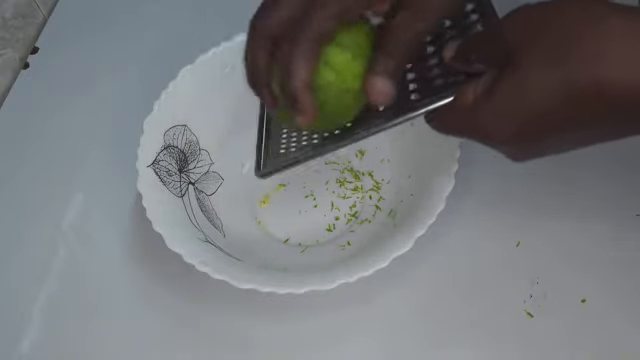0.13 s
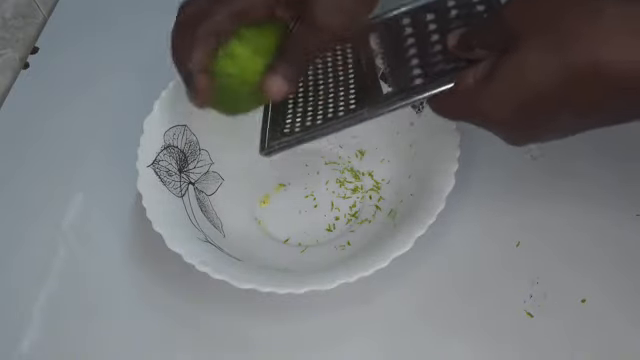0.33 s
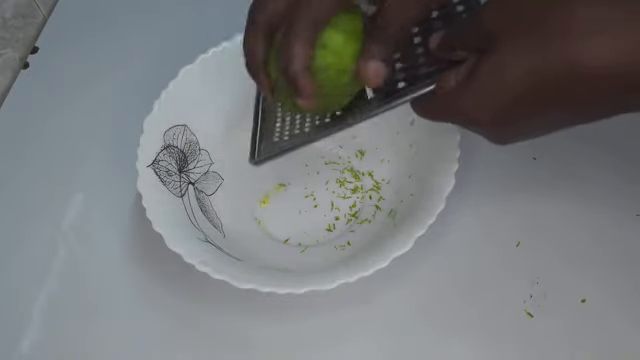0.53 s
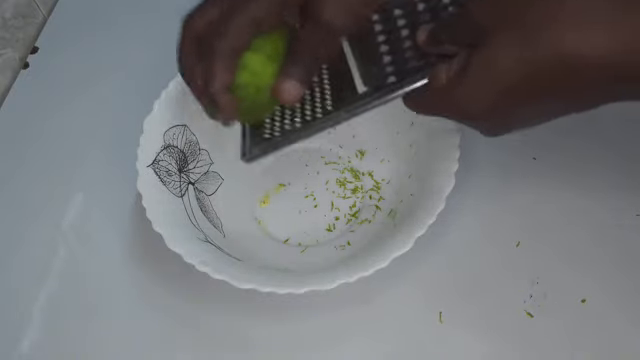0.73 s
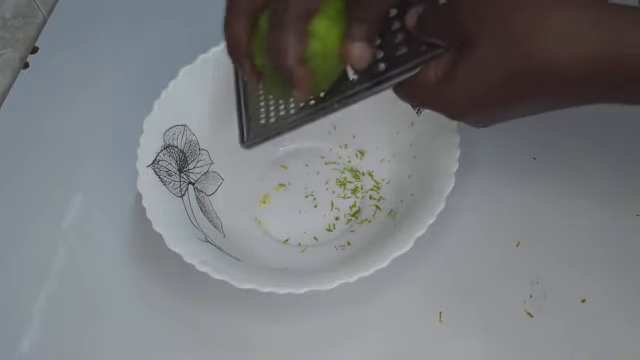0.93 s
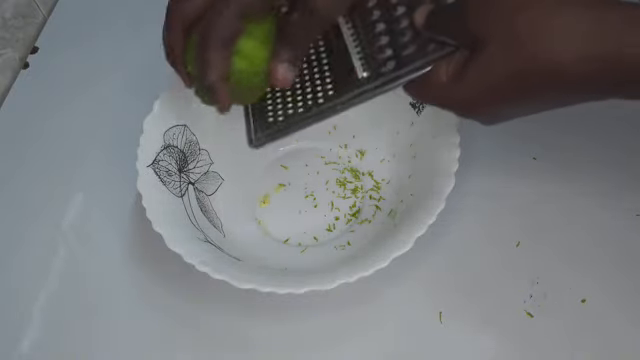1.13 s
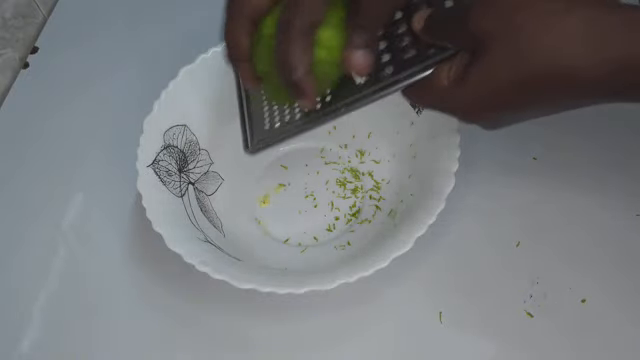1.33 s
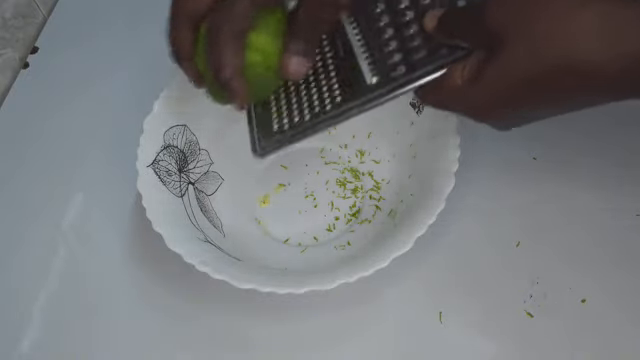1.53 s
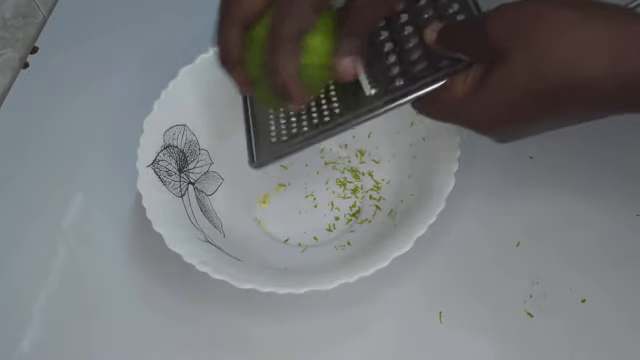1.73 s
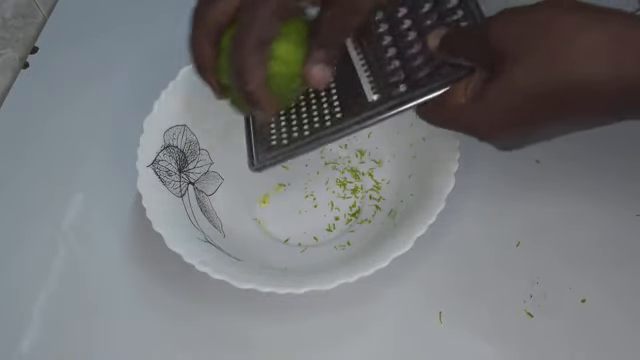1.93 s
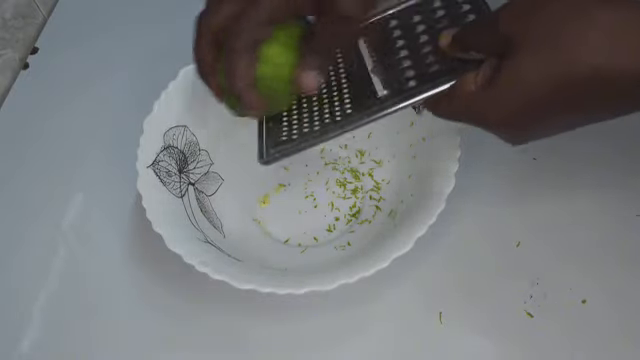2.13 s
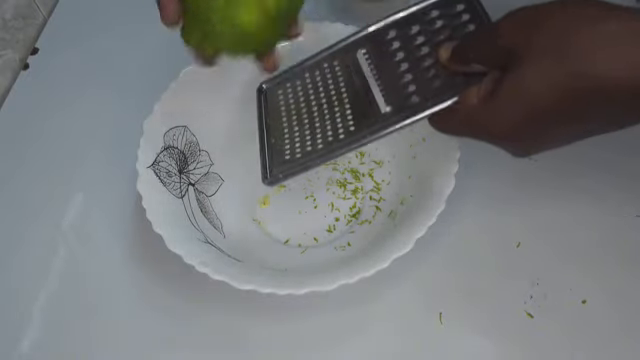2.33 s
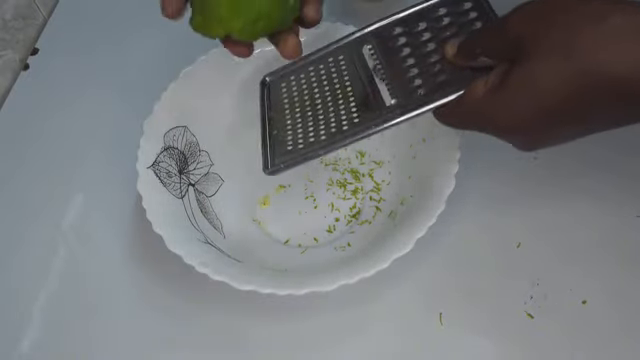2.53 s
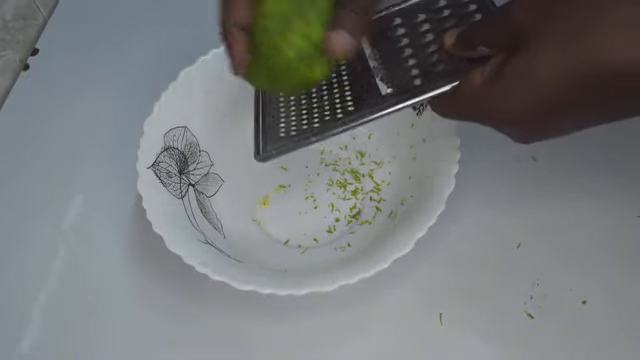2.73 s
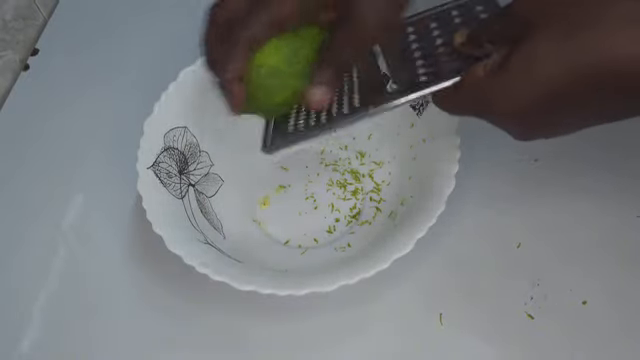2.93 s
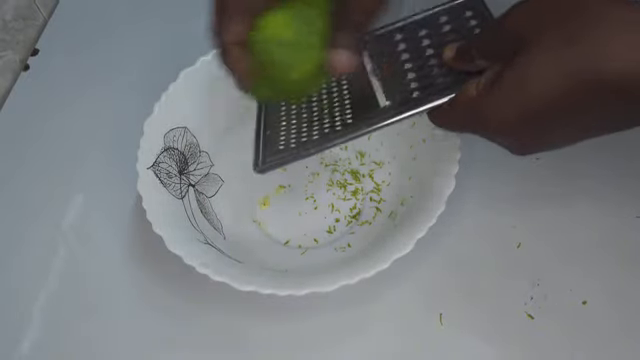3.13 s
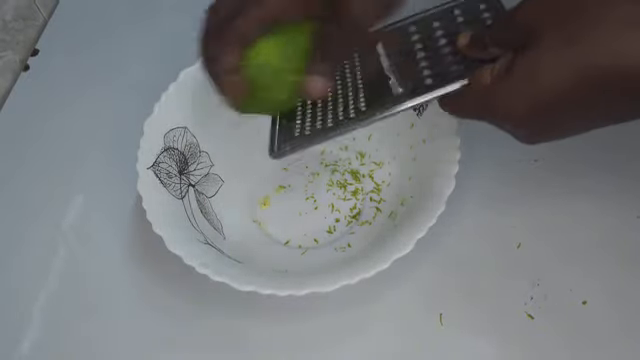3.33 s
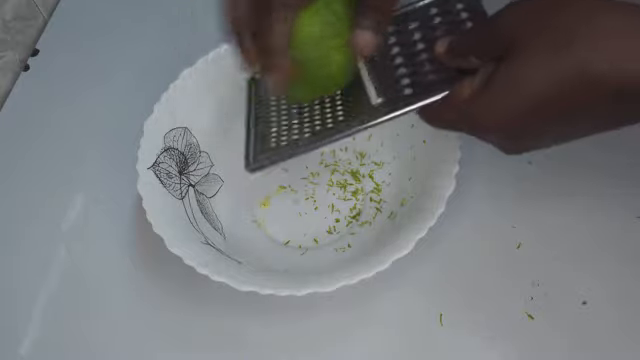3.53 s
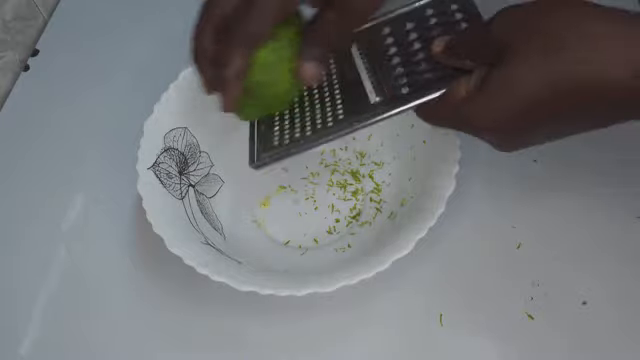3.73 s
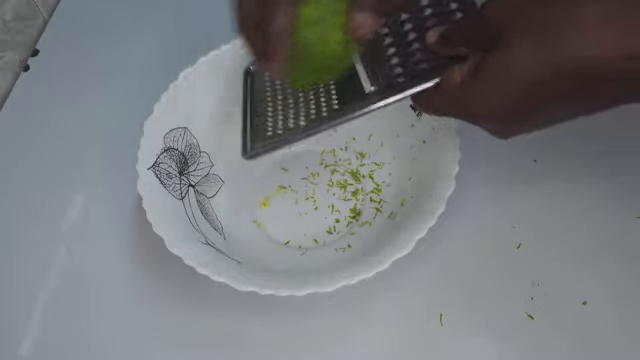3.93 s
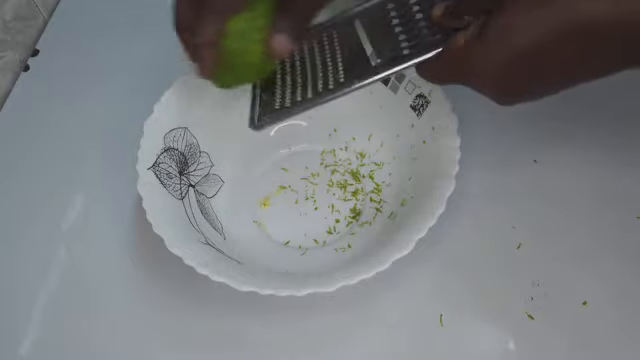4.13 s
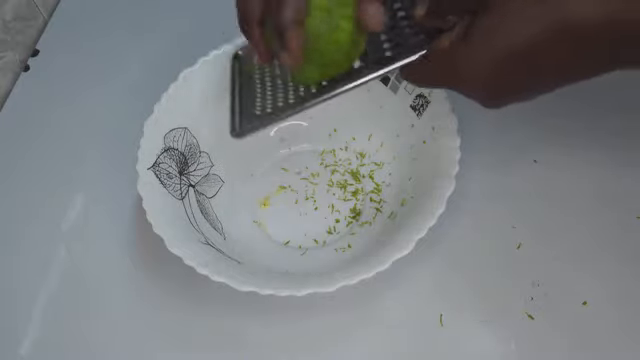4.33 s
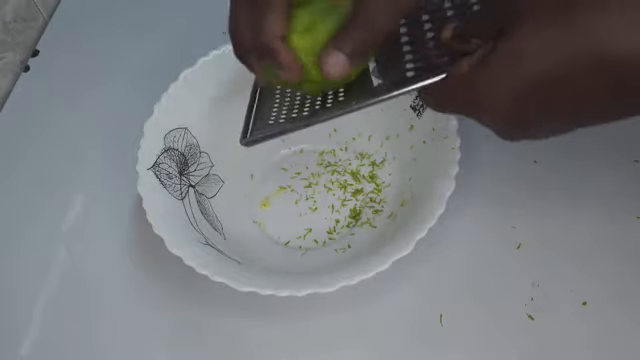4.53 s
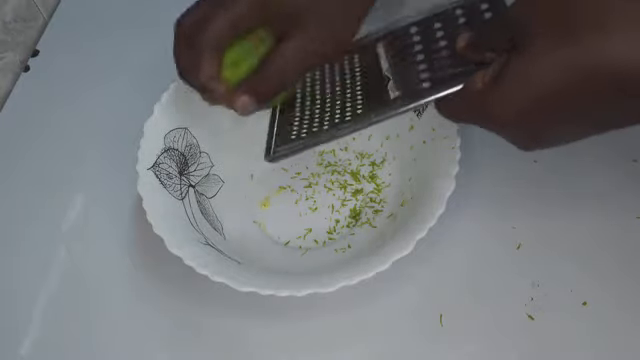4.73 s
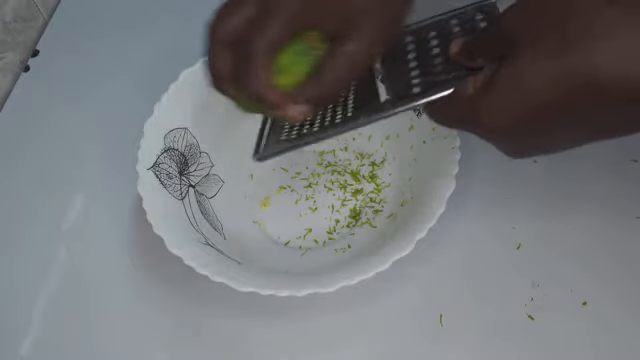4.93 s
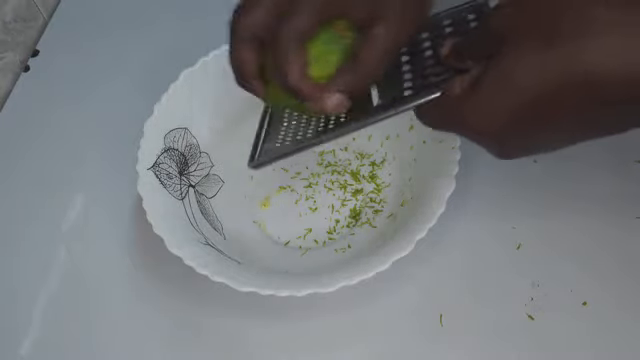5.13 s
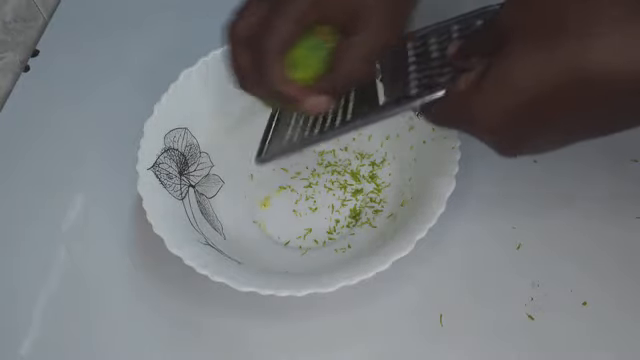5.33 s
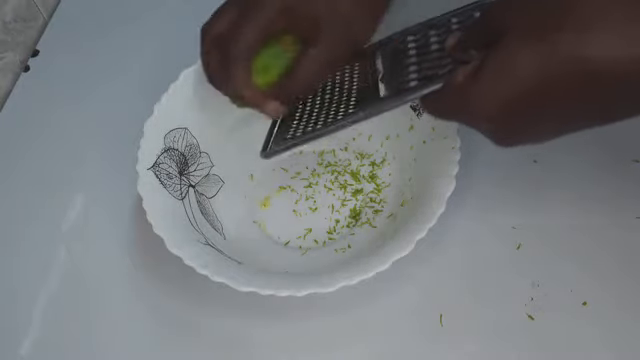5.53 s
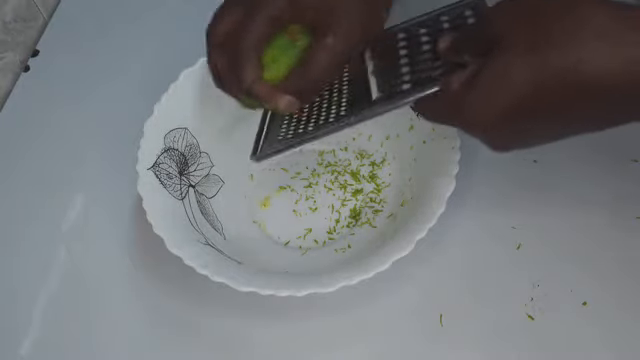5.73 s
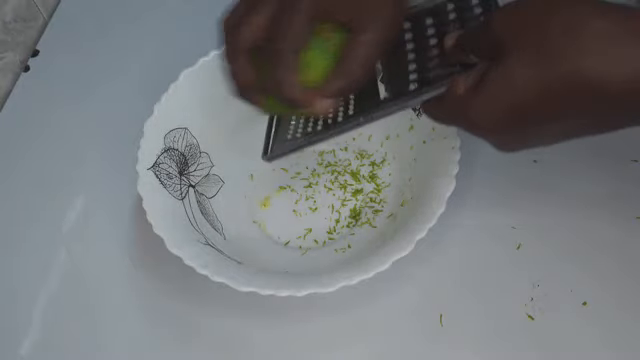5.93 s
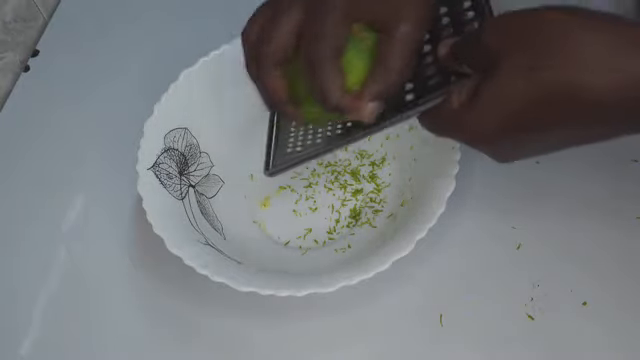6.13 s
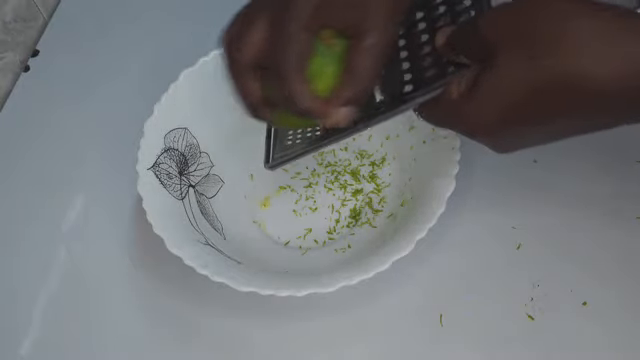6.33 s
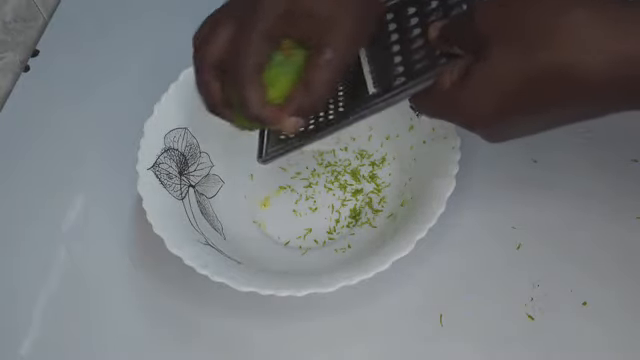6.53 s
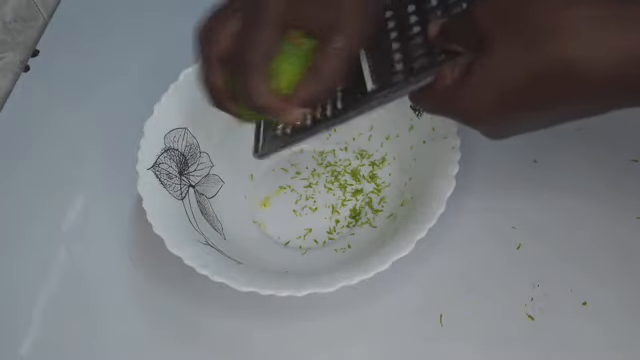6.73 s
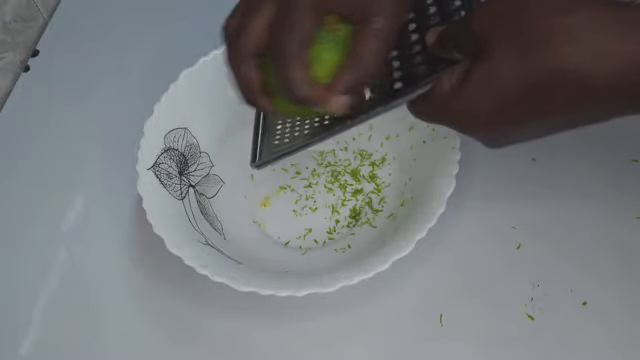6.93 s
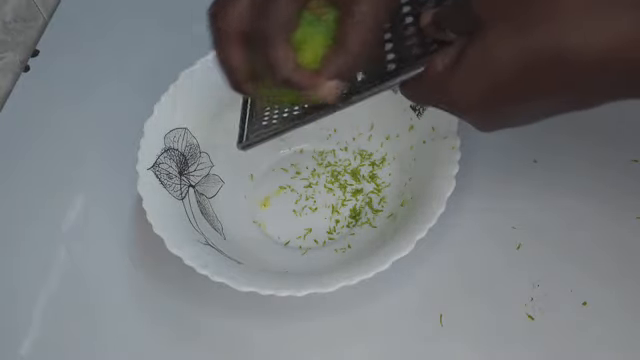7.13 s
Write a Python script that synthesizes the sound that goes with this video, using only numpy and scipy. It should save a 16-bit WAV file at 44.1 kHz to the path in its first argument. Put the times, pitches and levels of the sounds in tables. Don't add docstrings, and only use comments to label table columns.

```python
import sys
import numpy as np
from scipy import signal
from scipy.fft import rfft, irfft, next_fast_len
from scipy.io import wavfile
from scipy.ndimage import uniform_filter1d, map_coordinates

SR = 44100
rng = np.random.default_rng(int(sys.argv[2]) if len(sys.argv) > 2 else 0)


def gain_from_db(level_db):
    decades = np.asarray(level_db, float) / 20
    return 10 ** decades


def int16_out(signal):
    q = np.round(np.clip(np.atleast_2d(signal).T, -1, 1) * 32767)
    wavfile.write(sys.argv[1], SR, q.astype(np.int16))


N = 320607
TIME = np.arange(N) / SR

# [t/s, peak level/dB, plate above the peak/dB, ring f/Hz]
SNAGS = [(0.0245, -54, -18.5, 7400), (0.2096, -34, -9, 7270), (0.5741, -45, 1, 5100),
         (0.597, -50, -6, 5430), (0.6135, -35, 6, 7980), (0.636, -25.5, -6, 7370), (0.651, -20, -6, 11500),
         (0.9239, -49.5, -3, 6800), (1.461, -22, -20.5, 11600), (2.309, -47.5, -14, 7000),
         (2.4897, -67.5, -18, 13070), (2.5277, -64, -33, 11350), (2.594, -75, -18.5, 12900),
         (3.3837, -15.5, -26.5, 7470), (3.686, -38, 4, 7250), (4.125, -23, -27, 9840),
         (4.431, -40, 1, 6380), (4.5074, -55, -14, 7800), (4.6638, -16, 4.5, 11500),
         (4.843, -40, -9, 11500), (5.2468, -17, -3, 11540), (5.3275, -22.5, -24, 7840),
         (5.5805, -14.5, -12, 7950), (5.7498, -23, -16, 7760)]
# [t/s, peak level/dB, rattle above it/dB, low thud above it/dB, knock f/Hz]
LANDINGS = [(0.15, -39, -4.5, -13, 635), (0.521, -41.5, -13.5, -24, 606), (0.922, -48.5, -5, -19, 870),
            (1.328, -45, -12, -19, 855), (1.695, -47, -8, -14, 800), (2.065, -44, -7, -28, 617),
            (2.852, -39.5, -8.5, -17.5, 701), (3.264, -41, -16.5, -23, 640), (3.605, -38.5, -3.5, -10, 674),
            (4.019, -36.5, -28, -17.5, 635), (4.377, -38.5, -6.5, -25, 635), (4.428, -43, -10, -23, 720),
            (4.503, -61.5, -2, -14, 519)]


def unit(x):
    return x / np.sqrt(np.mean(x ** 2) + 1e-20)


def along(points, hz):
    f, value = np.transpose(points)
    return np.interp(np.log(hz + 1), np.log(f + 1), value)


def wobble(rate):
    knots = rng.standard_normal(int(N * rate / SR) + 4)
    return map_coordinates(knots, [TIME * rate])


def filtered(x, response):
    size = next_fast_len(N + SR // 2)
    hz = np.fft.rfftfreq(size, 1 / SR)
    return irfft(rfft(x, size) * response(hz), size)[..., :N]


def resonances(modes):
    def response(f):
        total = 0
        for k, (centre, width, db) in enumerate(modes):
            damping = 1j * f * width
            total = total + (-1) ** k * gain_from_db(db) * damping / (centre * centre - f * f + damping)
        return total
    return response


def body(force, modes, broad_db, lo_hz, hi_hz):
    ringing = resonances(modes)

    def response(f):
        high_pass = 1j * f / (lo_hz + 1j * f)
        band = high_pass / (1 + 1j * f / hi_hz) ** 2
        return ringing(f) + gain_from_db(broad_db) * band * high_pass

    power = np.mean(np.abs(response(np.linspace(0, SR / 2, 4096))) ** 2)
    return filtered(force, response) / np.sqrt(power)


def ports(pair, alike):
    def mid_side(hz):
        turn = np.arccos(np.clip(along(alike, hz), -1, 1)) / 2
        return np.array([np.cos(turn), np.sin(turn)])
    mid, side = filtered(pair, mid_side)
    return np.array([mid + side, mid - side])


def pressure():
    # [t/s, swell/s, bite/dB, top/dB, weight on the bowl/dB]
    single_strokes = [(.19, 0.078, -45.5, -31.5, -2), (.575, 0.11, -57, -33, 1),
                      (1.018, 0.073, -41.5, -37, -1.5), (1.397, 0.066, -37.5, -33.5, -4.5),
                      (1.772, 0.079, -38, -34, -0.5), (2.108, 0.063, -39.5, -32.5, -1),
                      (2.918, 0.063, -42.5, -36.5, 2.5), (3.311, 0.071, -42.5, -36, 0.5),
                      (3.703, 0.085, -42, -38.5, -0.5), (4.071, 0.067, -42, -35.5, 1),
                      (4.593, 0.064, -44.5, -36, 4.5)]
    down_strokes = [(4.934, 0.055, -38, -38.5, 1), (5.198, 0.047, -38, -36, 2.5),
                    (5.327, 0.024, -37.5, -41.5, 1), (5.436, 0.066, -36, -34.5, -1),
                    (5.576, 0.056, -39, -49, 0.5), (5.695, 0.049, -37, -40, -2),
                    (5.926, 0.058, -38.5, -34, -1), (6.184, 0.058, -35.5, -35.5, 0),
                    (6.433, 0.066, -39, -34, 0.5), (6.696, 0.063, -40.5, -32, -0.5),
                    (6.956, 0.055, -36.5, -32.5, 1.5), (7.218, .043, -35.5, -33, 0)]
    up_strokes = [
        (-.03, 0.043, -68, -72, 4),
        (4.81, 0.059, -49, -46, 4.5),
        (5.085, 0.044, -46, -46.5, 4.5),
        (5.8, 0.057, -50, -48.5, 3),
        (6.045, 0.066, -47, -47, 5.5),
        (6.305, .067, -50, -44.5, 5),
        (6.575, .063, -50, -46, 3.5),
        (6.82, 0.073, -48.5, -47, 7),
        (7.085, 0.065, -47, -45, 6.5),
    ]
    # [attack/s, attack depth/dB, release/s, release depth/dB, flex of the plate/dB]
    single_motion = (0.0048, 8, 0.0314, 13, -1)
    down_motion = (0.012, 8.4, 0.041, 19, 1.4)
    up_motion = (0.023, 8.6, 0.026, 11.6, .1)
    plate_over_db, bowl_over_db = (1.5, -4.5, -5, -8), (-4.5, -8.5, -9.5, -14)
    kinds = [(single_strokes, single_motion), (down_strokes, down_motion), (up_strokes, up_motion)]
    gain = np.zeros((3, N))
    for strokes, (attack, rise_db, release, fall_db, flex_db) in kinds:
        for s, swell, bite_db, top_db, weight_db in strokes:
            top_s = max(swell, attack + .002)
            corners = s + np.array([0, attack, top_s, top_s + release])
            near = slice(max(0, round((s - .1) * SR)), round((corners[-1] + .02) * SR))
            t = TIME[near]
            bite = np.clip(1 + (t - s) / .007, 0, 1) ** 2
            creep = gain_from_db(-17) * np.clip(1.2 + (t - s) / 0.026, 0, 1)
            lift = np.clip(1 + (corners[-1] - t) / 0.015, 0, 1) ** 2
            touch = np.maximum(bite, creep) * lift
            tear_db = np.array([bite_db - rise_db, bite_db, top_db, top_db - fall_db])
            plate_db = tear_db + plate_over_db + flex_db + 0.29 * weight_db
            bowl_db = tear_db + bowl_over_db + weight_db
            for k, db in enumerate([tear_db, plate_db, bowl_db]):
                gain[k, near] += touch * gain_from_db(np.interp(t, corners, db))
    return gain


def counter():
    # [t/s, level/dB]
    passing = [
        (0, -80),
        (2.7, -87),
        (4.5, -77),
        (5.7, -70.5),
        (6.12, -67),
        (6.3, -79),
        (6.68, -75),
        (6.86, -58),
        (7.1, -61.5),
        (7.27, -72),
    ]
    # [t/s, level/dB]
    bumps = [
        (.42, -64.5),
        (3.06, -67.5),
        (4.7, -57.5),
        (4.8, -69),
        (6.5, -57),
        (7.27, -64),
    ]
    arm_s, arm_late_s, bump_s = .07, .01, .035
    lean_t = np.arange(-SR // 4, SR // 4) / SR - arm_late_s
    lean = np.exp(-.5 * lean_t ** 2 / (arm_s / 2) ** 2)
    arm = np.abs(signal.fftconvolve(pressure()[0], lean / lean.sum(), "same"))
    leaning = sum(gain_from_db(db) * np.exp(-np.abs(TIME - s) / bump_s) for s, db in bumps)
    drone_gain = gain_from_db(np.interp(TIME, *np.transpose(passing))) + gain_from_db(-32.5) * arm
    thud_gain = gain_from_db(-90) + gain_from_db(-32.5) * arm + leaning
    return drone_gain, thud_gain


def background():
    # [f/Hz, density/dB per Hz]
    hush_colour = [(20, -5), (50, -9.5), (100, -16), (200, -21.5), (500, -28), (1500, -32.5), (4000, -38.5),
                   (9000, -46.5), (11500, -41), (16000, -45)]
    # [f/Hz, left-right likeness]
    hush_alike = [(60, 0.92), (130, 0.59), (290, -0.034), (640, 0.6), (1410, -0.47), (3100, 0.095),
                  (6820, -0.2), (15000, -0.01)]
    # [f/Hz, level/dB]
    hum_tones = [(102.3, -86), (333.8, -97.5), (500.6, -87)]
    hush = unit(filtered(rng.standard_normal((2, N)), lambda f: gain_from_db(along(hush_colour, f))))
    hush = gain_from_db(-72 + .8 * wobble(9.4)) * ports(hush, hush_alike)
    hum = 0
    for hz, db in hum_tones:
        hum = hum + gain_from_db(db + 2 + 2.5 * wobble(4.5)) * np.sin(2 * np.pi * hz * TIME + .3 * wobble(11))
    drone_gain, thud_gain = counter()
    engine = np.sin(2 * np.pi * 69 * TIME + 1.8 * wobble(7))
    rumble = unit(filtered(rng.standard_normal(N), resonances([(72.4, 24, 0)])))
    drone = unit(engine + 1.2 * rumble)
    wood = resonances([(150, 40, 0)])
    thud = unit(filtered(rng.standard_normal(N), lambda f: wood(f) ** 2))
    return hush + hum + drone_gain * drone + gain_from_db(-2.5) * thud_gain * thud


def grains(spread_db, flutter_db, patchy_db):
    flutter = flutter_db * (wobble(70) + wobble(300))
    size = gain_from_db(spread_db * rng.exponential(size=N) + flutter)
    spectrum = signal.stft(size * rng.standard_normal((2, N)), nperseg=256)[2]
    patches = uniform_filter1d(rng.standard_normal(spectrum.shape[1:]), size=6, axis=0)
    patches = unit(uniform_filter1d(patches, size=8, axis=1))
    tearing = signal.istft(spectrum * gain_from_db(patchy_db * patches), nperseg=256)[1]
    return unit(tearing[:, :N])


def steel(at_teeth, at_plate, at_bowl):
    # [f/Hz, width/Hz, level/dB]
    teeth_modes = [(4560, 100, -11), (5750, 480, -20), (7250, 190, -4), (7950, 630, 7.5), (8900, 360, -13),
                   (11500, 360, 10.5), (13400, 340, -3), (15600, 530, -6.5)]
    # [f/Hz, width/Hz, level/dB]
    plate_modes = [(1304, 166, 0), (1738, 410, 2), (2220, 160, -17.5), (2994, 150, 4.5)]
    # [f/Hz, width/Hz, level/dB]
    bowl_modes = [(234, 13.6, -6.5), (287, 34, -9), (410, 47, -6), (448.7, 33.6, -2.5), (501, 65, -7),
                  (635, 102, 0), (737, 101, -5), (866, 121, -3.5)]
    # [f/Hz, density/dB per Hz]
    tear_colour = [(3300, 3.5), (4060, -1.5), (4810, 2.5), (6700, 1.5), (7290, 3), (10400, -6),
                   (11700, -2.5), (12700, -4.5)]
    teeth = body(at_teeth, teeth_modes, broad_db=3, lo_hz=2490, hi_hz=40700)
    teeth = filtered(teeth, lambda f: gain_from_db(0.67 * along(tear_colour, f) + 3))
    plate = body(at_plate, plate_modes, broad_db=-.5, lo_hz=880, hi_hz=4970)
    bowl = body(at_bowl, bowl_modes, broad_db=-8.5, lo_hz=362, hi_hz=1425)
    return teeth + plate + bowl


def grater():
    slips = gain_from_db(1.33 * wobble(45) + 1.2 * wobble(140))
    tear, plate, bowl = pressure() * unit(slips)
    at_teeth = gain_from_db(-1.5) * tear * grains(spread_db=1.5, flutter_db=0.1, patchy_db=3)
    at_plate = gain_from_db(-2.0) * plate * grains(spread_db=2.5, flutter_db=1.54, patchy_db=3.0)
    at_bowl = gain_from_db(-3.0) * bowl * grains(spread_db=2.0, flutter_db=1.6, patchy_db=1.54)
    return steel(at_teeth, at_plate, at_bowl)


def fingers():
    # [t/s, level/dB, t60/s]
    turns = [
        (0.0, -92, .3),
        (2.33, -69, .14),
        (2.524, -74, 0.29),
        (3.13, -77, .9),
        (3.186, -76, .08),
        (3.24, -76, .2),
    ]
    gain = sum((TIME >= s) * gain_from_db(db - 60 * np.abs(TIME - s) / t60) for s, db, t60 in turns)
    skin = resonances([(11600, 1500, -0.16), (14000, 3000, -1.3)])
    crackle = filtered(grains(spread_db=1, flutter_db=4.5, patchy_db=-1.0), skin)
    return gain_from_db(-1.5) * gain * unit(crackle)


def snags():
    ring, t = np.zeros((2, N + SR)), np.arange(SR // 50) / SR
    for s, db, _, hz in SNAGS:
        phase = np.cumsum(rng.normal(0, .35, (2, len(t))), axis=1)
        decay = gain_from_db(db - 3.5 - 60 * t / 0.012) * (1 - np.exp(-t / 0.00027))
        ring[:, round(s * SR):][:, :len(t)] += decay * np.sin(2 * np.pi * hz * t + phase)
    return ring[:, :N]


def knocks():
    knock, t = np.zeros(N + SR), np.arange(SR // 10) / SR
    for s, db, _, thud_db, hz in LANDINGS:
        plate = gain_from_db(db - 60 * t / 0.014) * (1 - np.exp(-t / 0.00029)) * np.sin(2 * np.pi * hz * t)
        thud_decay = gain_from_db(db + thud_db - 60 * t / 0.07) * (1 - np.exp(-t / 0.0013))
        thud = thud_decay * np.sin(2 * np.pi * 0.53 * hz * t)
        knock[round((s + .001) * SR):][:len(t)] -= plate + thud
    return knock[:N] * [[1], [.4]]


def pings():
    # [t/s, peak level/dB]
    brushes = [
        (2.394, -71),
        (3.1944, -74),
    ]
    # [f/Hz, level/dB, t60/s]
    rim_modes = [(2800, -1.5, .07), (4780, -4, .06)]
    ring, t = np.zeros(N + SR), np.arange(SR // 4) / SR
    for s, db in brushes:
        for hz, level_db, t60 in rim_modes:
            ring[round(s * SR):][:len(t)] += gain_from_db(db + level_db - 60 * t / t60) * np.sin(2 * np.pi * hz * t)
    return ring[:N] * [[1], [.7]]


def bursts(times, levels_db, rise, t60):
    force, t = np.zeros((2, N + SR)), np.arange(SR // 10) / SR
    for s, db in zip(times, levels_db):
        shape = gain_from_db(db - 60 * t / t60) * (1 - np.exp(-t / rise))
        force[:, round(s * SR):][:, :len(t)] += shape * rng.standard_normal((2, len(t)))
    return force[:, :N]


def contacts():
    land_s, land_db, rattle_db, _, _ = np.transpose(LANDINGS)
    snag_s, snag_db, ring_db, _ = np.transpose(SNAGS)
    at_teeth = bursts(land_s + 0.0027, land_db + rattle_db + 2.5, rise=.002, t60=0.033)
    at_teeth += bursts(snag_s, snag_db - 2.5, rise=0.00086, t60=0.0084)
    at_plate = bursts(land_s + .002, land_db - 8, rise=.0007, t60=0.021)
    at_plate += bursts(snag_s, snag_db + ring_db - 4.0, rise=0.0022, t60=0.018)
    at_bowl = bursts(land_s + 0.0033, land_db - 9.5, rise=0.0024, t60=0.045)
    return steel(at_teeth, at_plate, at_bowl) + knocks() + snags() + pings()


def kitchen(pair, count=48):
    # [f/Hz, t60/s]
    reverb = [(300, 0.26), (2000, 0.28), (7000, 0.3), (15000, .22)]
    wet, step = np.zeros((2, N + 2 * SR)), N // count + 1
    for k in range(count):
        hz, t, noise = signal.stft(rng.standard_normal((2, SR // 2)), SR, nperseg=256)
        decay = gain_from_db(-60 * t / along(reverb, hz)[:, None])
        tail = signal.istft(noise * decay, SR, nperseg=256)[1]
        moment = pair[:, k * step:][:, :step]
        answer = signal.fftconvolve(moment, tail / np.linalg.norm(tail[0]), axes=1)
        wet[:, k * step + 130:][:, :answer.shape[1]] += answer
    return wet[:, :N]


def scene():
    # [f/Hz, left-right likeness]
    grater_alike = [(60, 0.59), (130, 0.72), (290, 0.79), (640, 0.61), (1410, 0.34), (3100, 0.0035),
                    (6820, 0.013), (15000, 0.083)]
    # [f/Hz, left above right/dB]
    left_over_right = [(60, 0), (110, 10), (200, 2.0), (380, -3), (700, 5.5), (1290, 0.5), (2380, 3),
                       (4400, 1.5), (8120, 4), (15000, 0.5)]
    lag_s = -2.5 / SR
    side = np.array([[.5], [-.5]])
    rub, hits = grater() + fingers(), contacts()
    room = kitchen(gain_from_db(-4.5) * rub + gain_from_db(-5.5) * hits)
    heard = ports(rub + hits + room, grater_alike)

    def placing(f):
        return gain_from_db(side * along(left_over_right, f) + 1.52) * np.exp(-2j * np.pi * f * side * lag_s)

    return filtered(heard, placing) + background()


def low_pass(x):
    return signal.sosfilt(signal.butter(12, 17020, fs=SR, output="sos"), x)


def record(dry):
    limited = filtered(dry, lambda f: gain_from_db(-np.clip((f - 15760) * .2, 0, 60)))
    return low_pass(limited)


dry = scene()
out = record(dry)
int16_out(out)
```